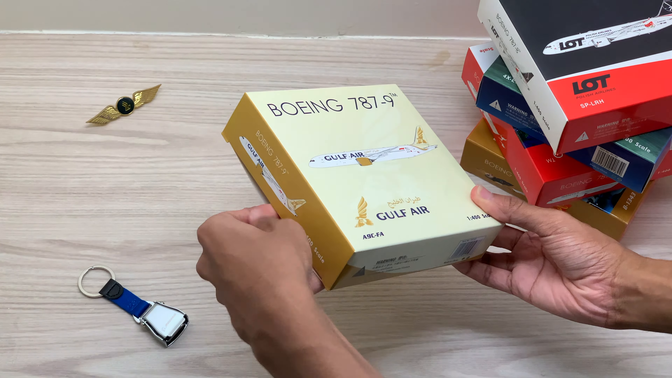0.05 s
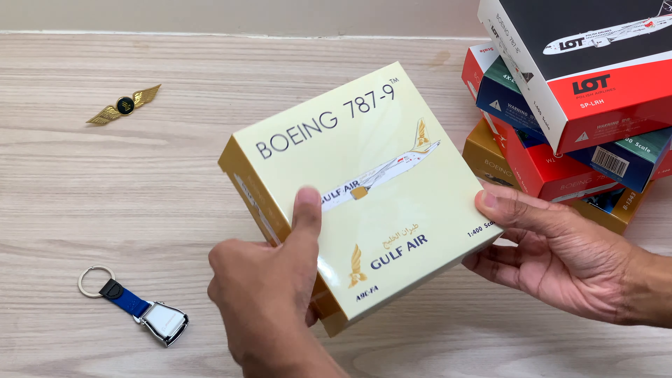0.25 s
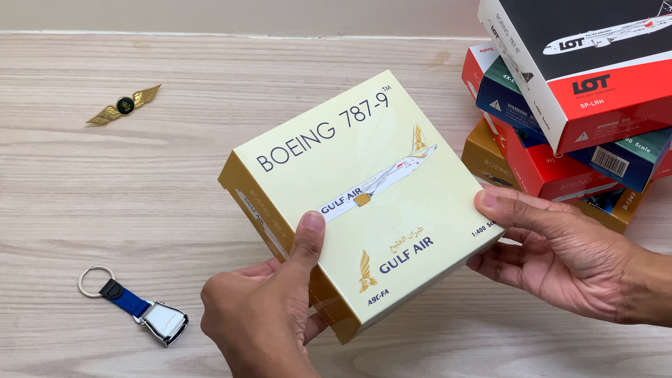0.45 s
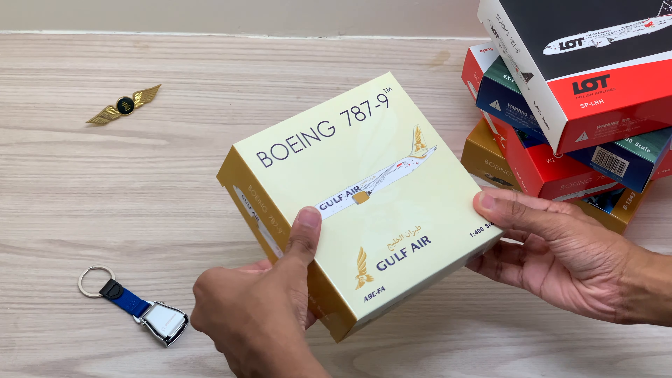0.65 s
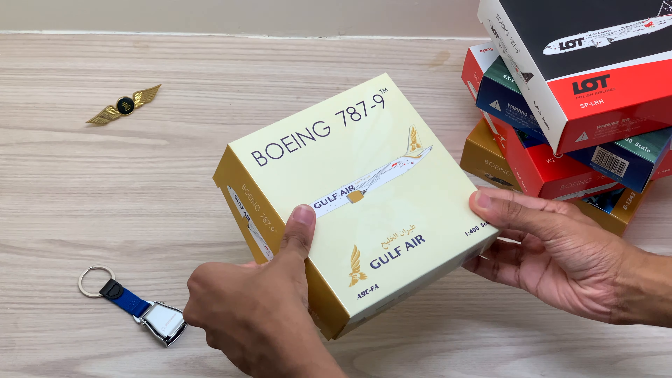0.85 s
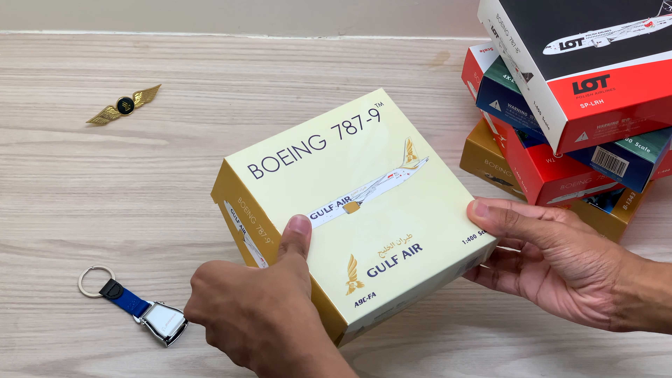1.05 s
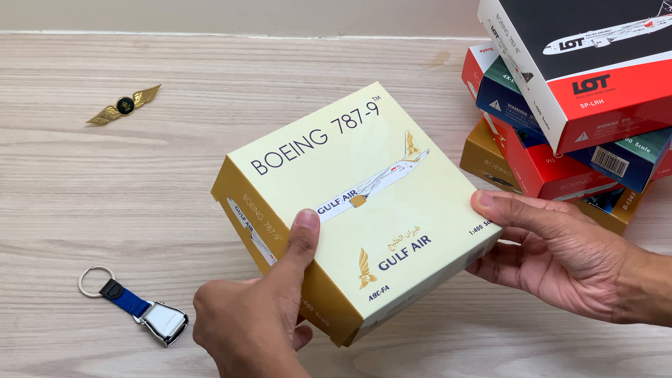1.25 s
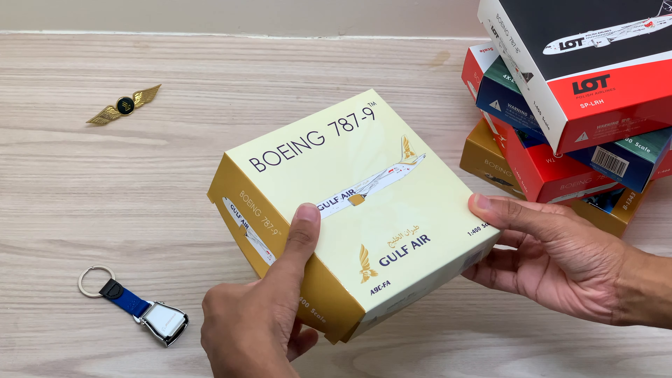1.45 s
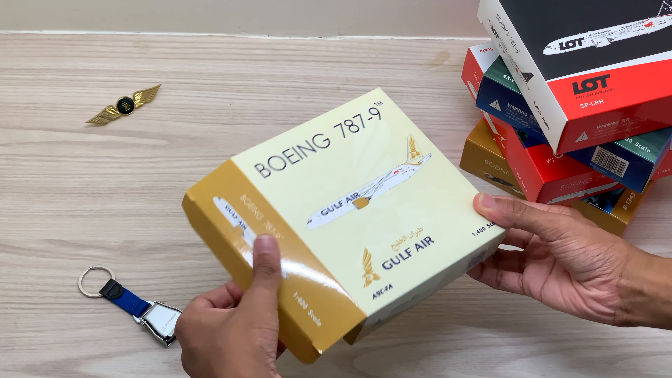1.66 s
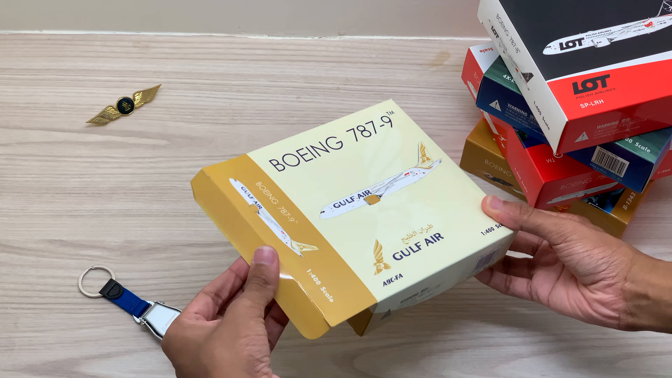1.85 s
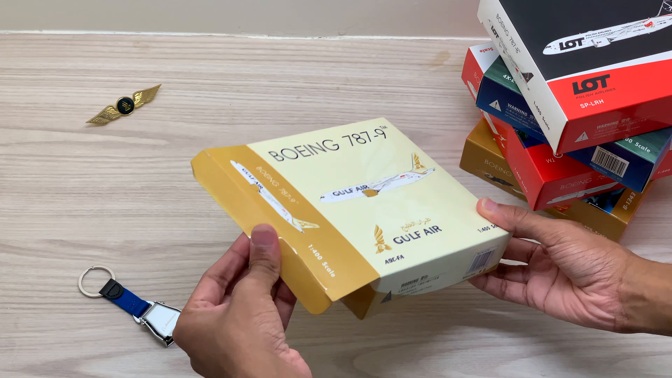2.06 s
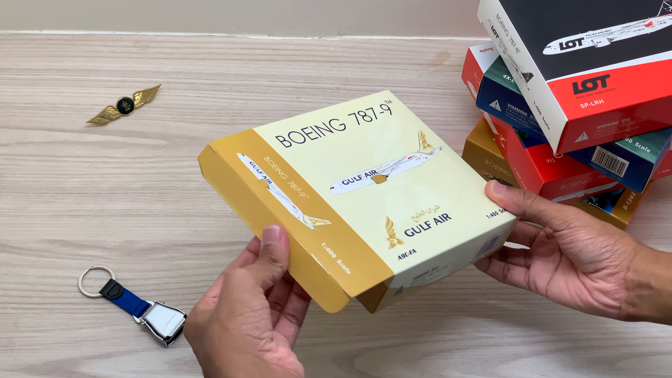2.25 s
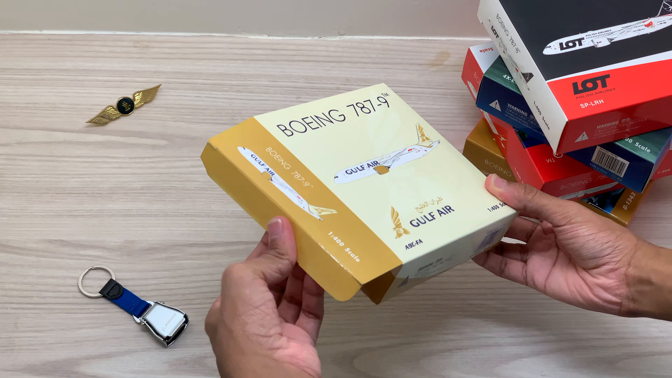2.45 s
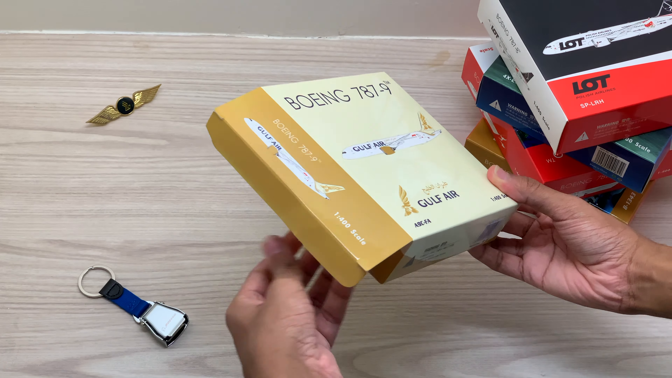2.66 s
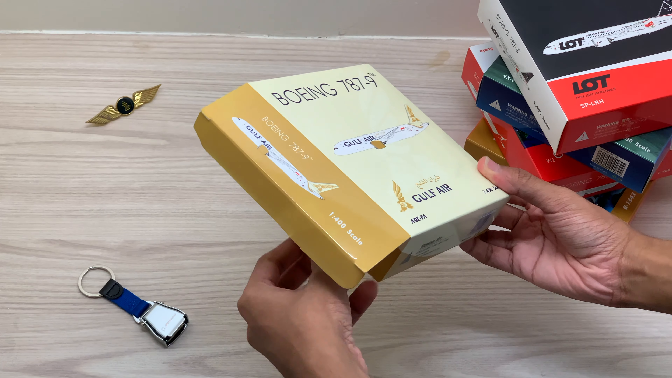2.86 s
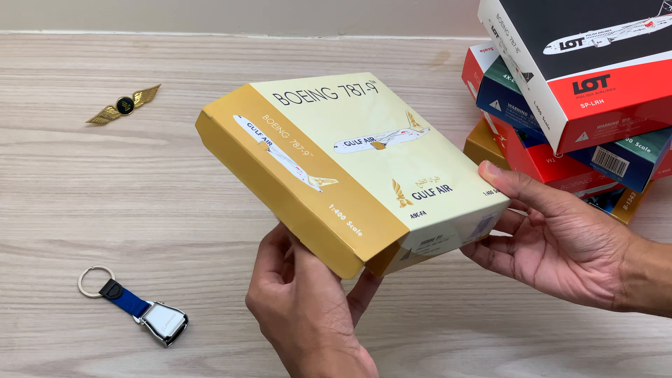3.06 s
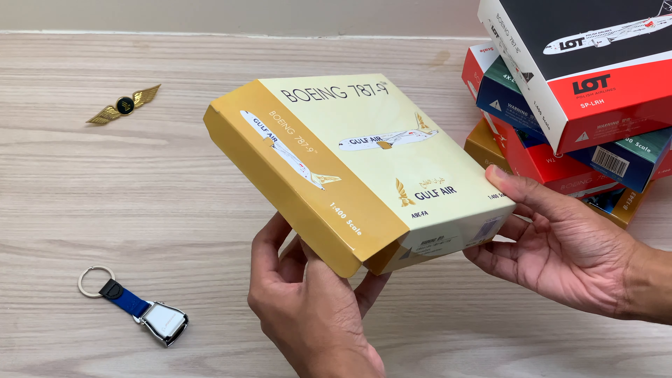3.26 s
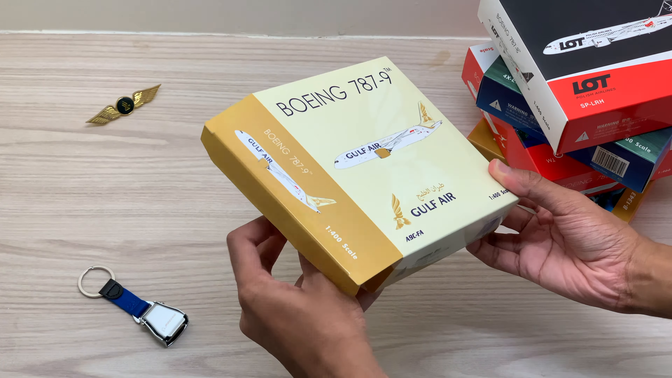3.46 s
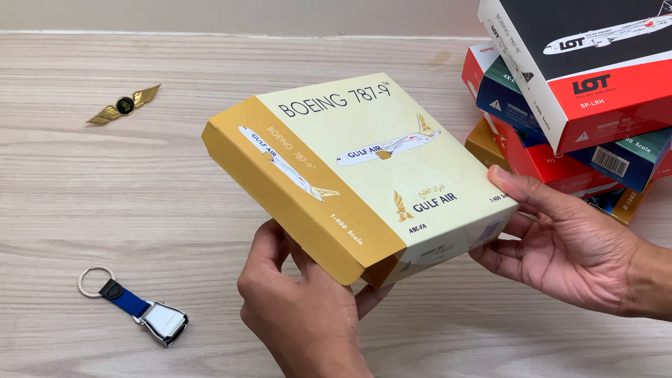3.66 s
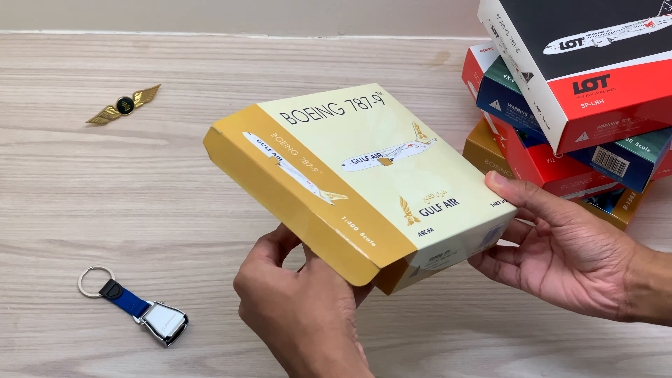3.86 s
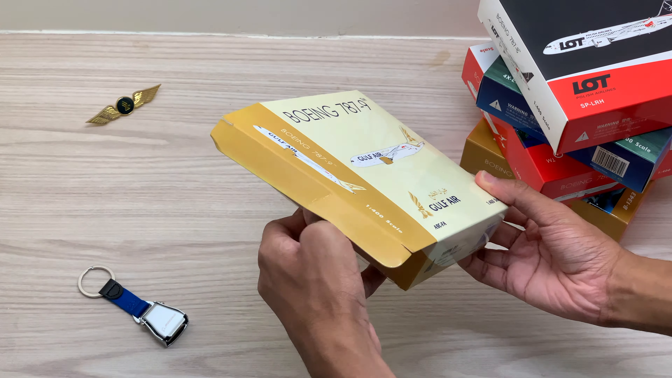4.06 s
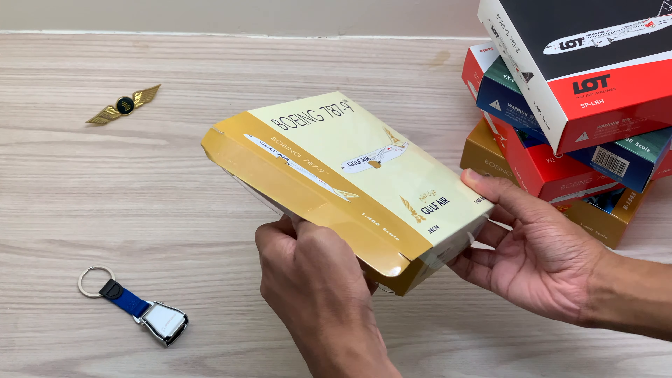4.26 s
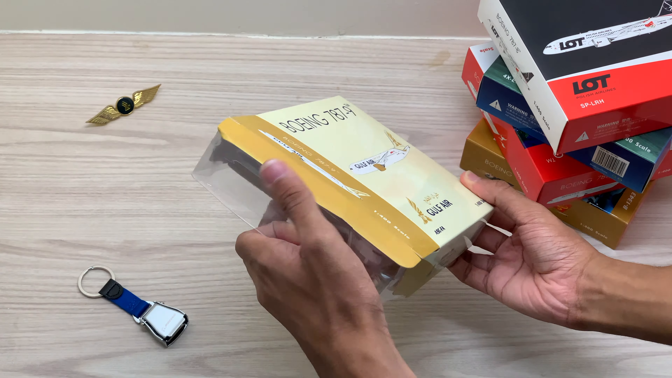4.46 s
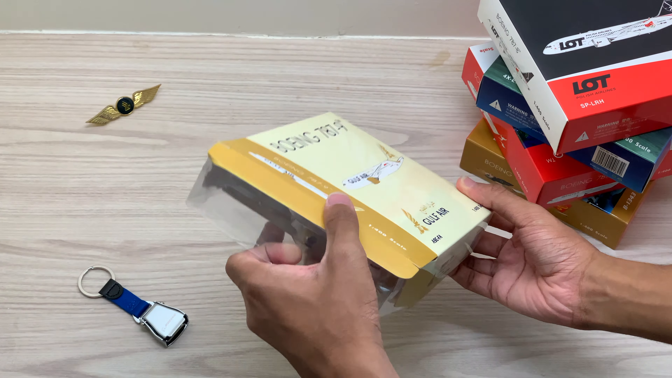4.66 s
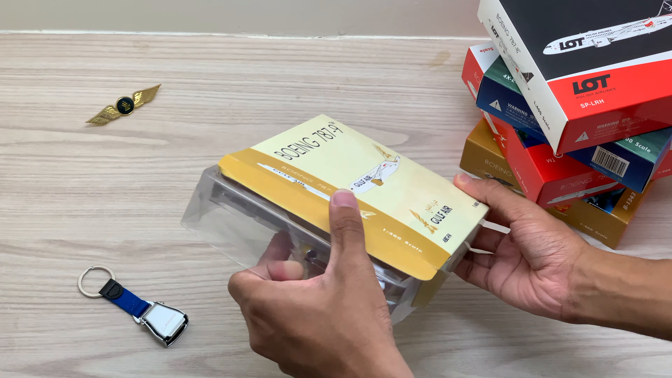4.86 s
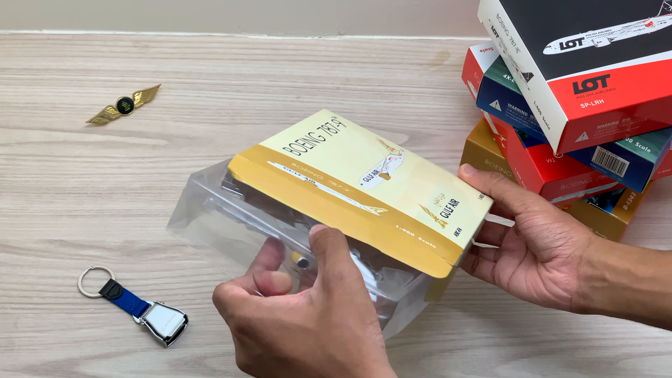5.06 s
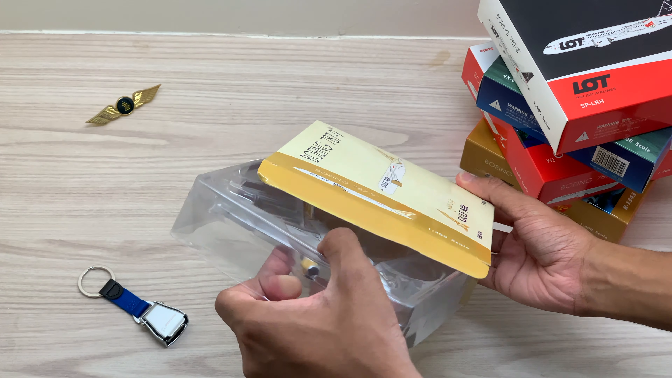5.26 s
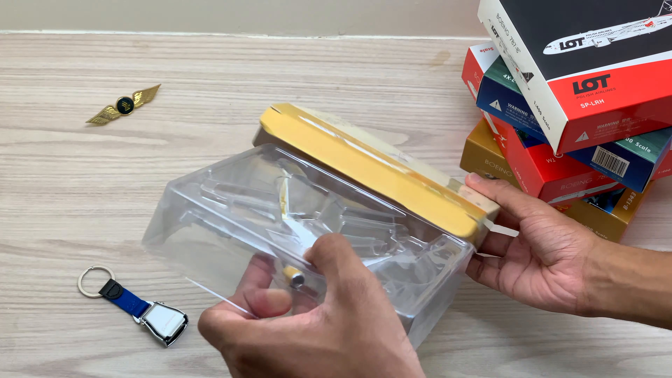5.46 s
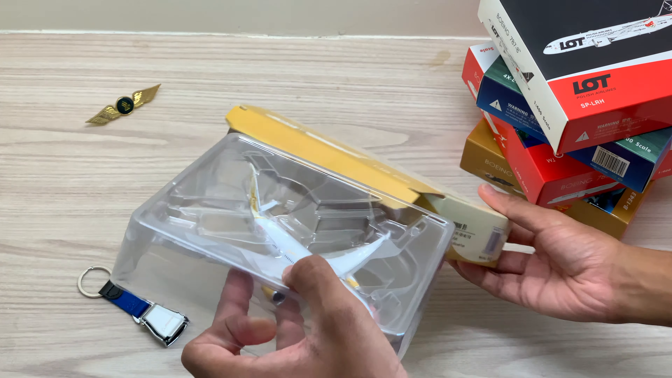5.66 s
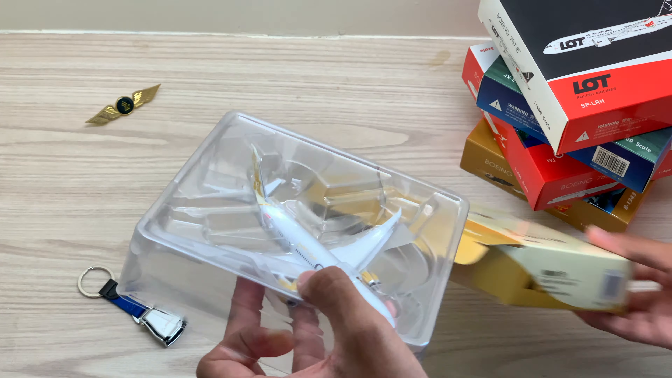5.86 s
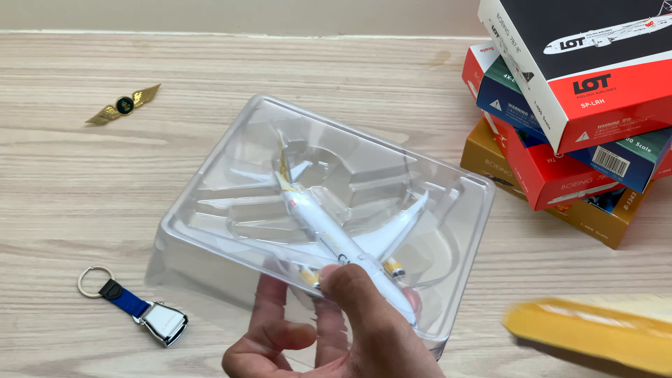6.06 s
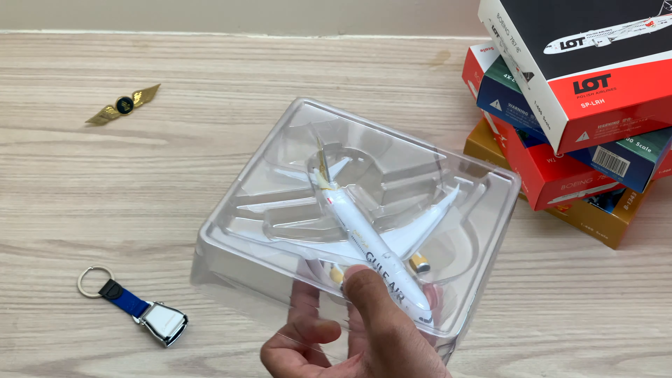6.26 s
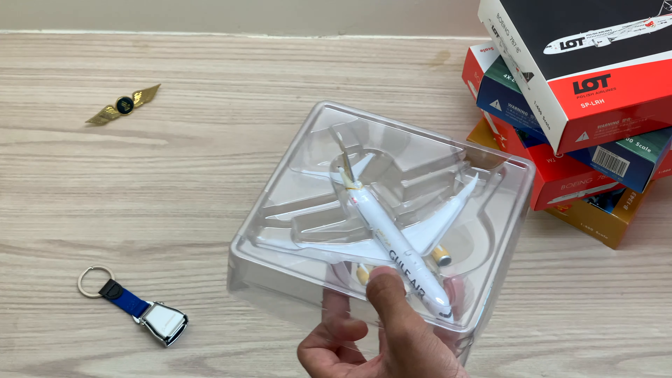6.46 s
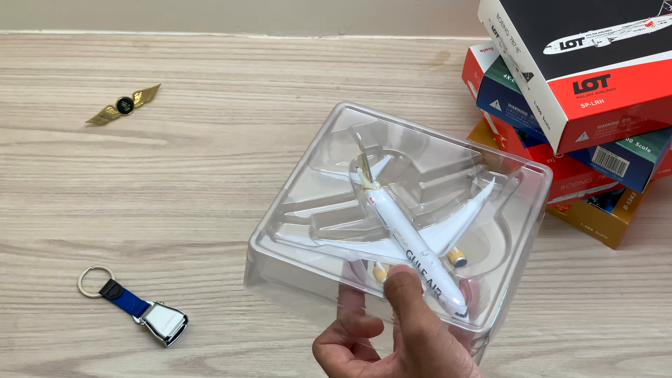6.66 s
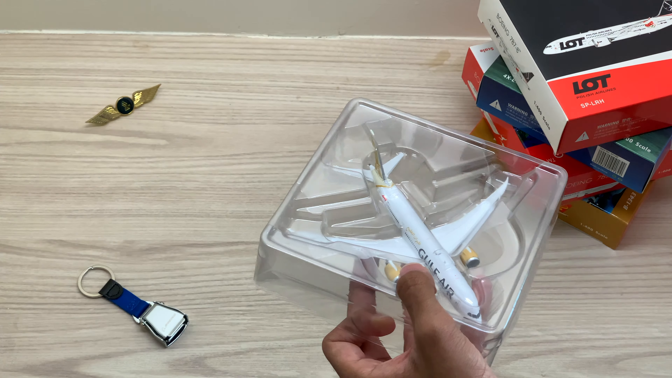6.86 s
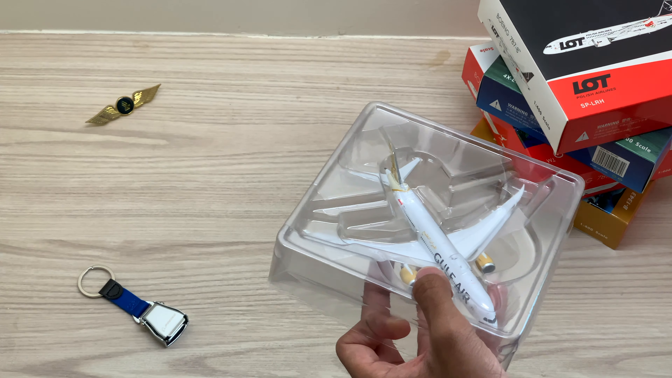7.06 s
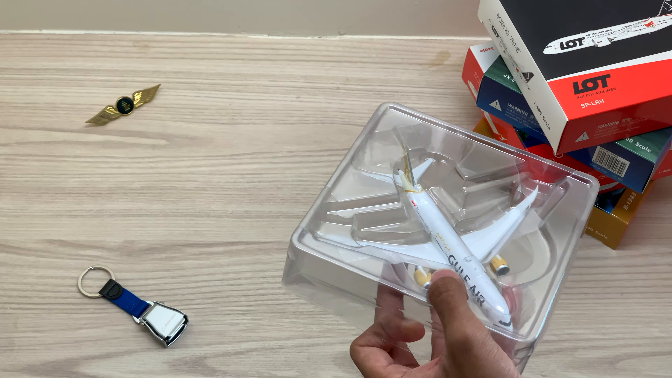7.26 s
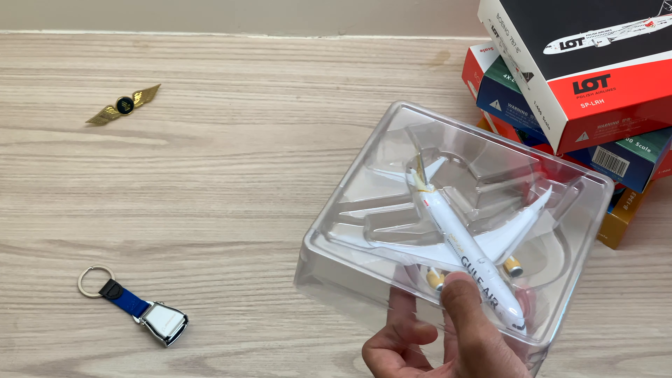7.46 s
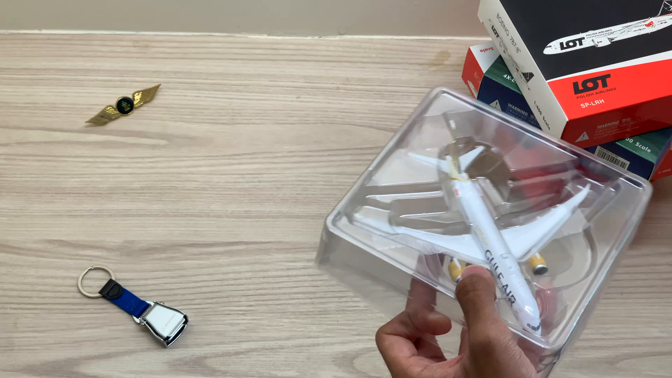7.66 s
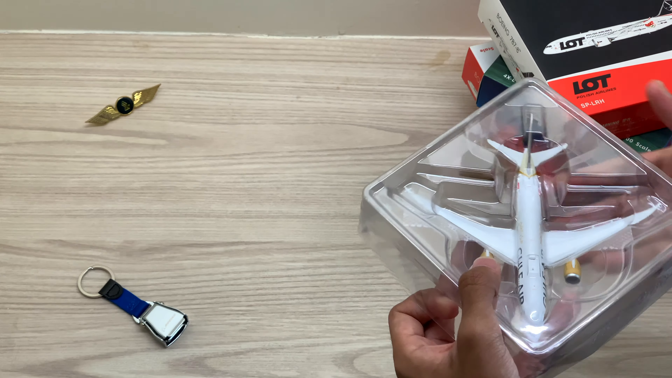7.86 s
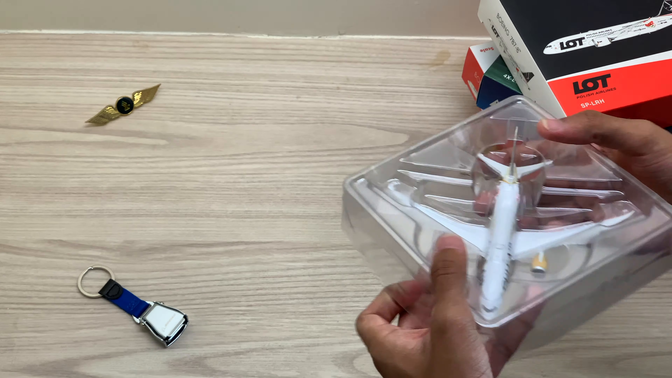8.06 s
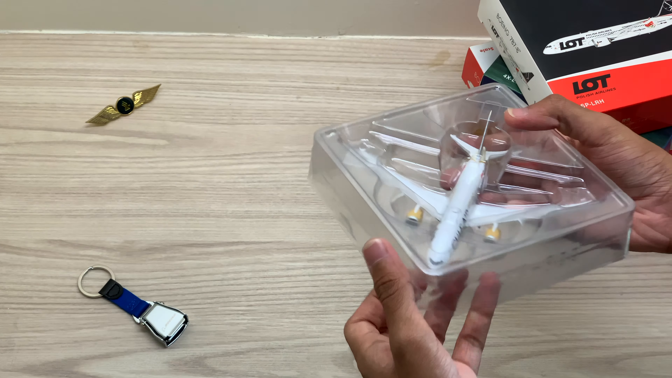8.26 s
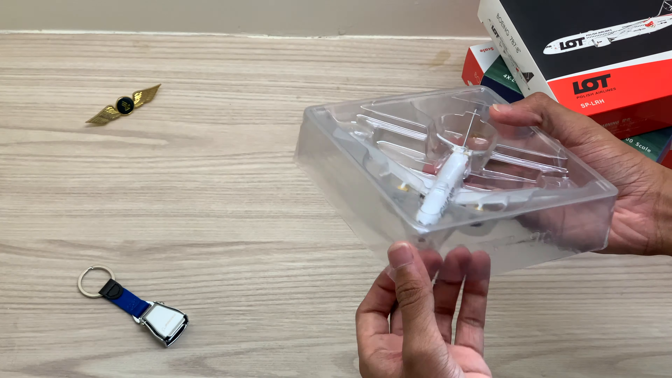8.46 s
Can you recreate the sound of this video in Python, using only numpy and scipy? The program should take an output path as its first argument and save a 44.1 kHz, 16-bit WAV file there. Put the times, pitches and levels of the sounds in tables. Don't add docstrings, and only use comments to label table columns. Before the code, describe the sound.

Close, dry thumps and rubs of a small card box, sharp plastic crackles as a tray is pulled free, a quiet pause, then more snaps.

```python
import sys
import numpy as np
from scipy import signal
from scipy.fft import rfft, irfft, next_fast_len
from scipy.io import wavfile
from scipy.ndimage import uniform_filter1d

SR = 44100
rng = np.random.default_rng(int(sys.argv[2]) if len(sys.argv) > 2 else 0)


def level_to_linear(level):
    exponent = np.asarray(level, float) / 20
    return 10 ** exponent


def to_wav(sig):
    pcm = np.clip(np.atleast_2d(sig), -1, 1) * 32767
    pcm = np.round(pcm).astype(np.int16)
    wavfile.write(sys.argv[1], SR, pcm.T)


N = 375732


def evened(x):
    return x / np.sqrt(np.mean(x ** 2) + 1e-20)


def read(points, hz):
    f, value = np.transpose(points)
    return np.interp(np.log(hz + 1), np.log(f + 1), value)


def slow(hz):
    knots_per_s = 200
    knots = rng.standard_normal(int(N / SR * knots_per_s) + 2)
    bell = np.exp(-(np.arange(-200, 201) * hz / knots_per_s) ** 2)
    smooth = evened(np.convolve(knots, bell, "same"))
    return np.interp(np.arange(N) * knots_per_s / SR, np.arange(len(knots)), smooth)


def band(x, lo_hz, hi_hz):
    return signal.sosfilt(signal.butter(4, [lo_hz, hi_hz], "band", fs=SR, output="sos"), x)


def resonate(x, hz, width):
    turn = np.exp(2j * np.pi * np.cumsum(hz * np.ones(N)) / SR)
    r = np.exp(-np.pi * width / SR)
    return turn * signal.lfilter([np.sqrt(2 * (1 - r * r))], [1, -r], x / turn)


def ring(x, hz, width):
    r = np.exp(-np.pi * 3.24 * width / SR)
    pole = r * np.exp(2j * np.pi * hz / SR)
    return signal.lfilter([np.sqrt(2 * (1 - r * r) ** 3 / (1 + r * r))], [1, -2 * pole, pole ** 2], x)


def patchy(x, patchy_db):
    z = signal.stft(x, nperseg=256)[2]
    patches = uniform_filter1d(uniform_filter1d(rng.standard_normal(z.shape), 3, 0), 18, 1)
    return signal.istft(z * level_to_linear(patchy_db * evened(patches)), nperseg=256)[1][:N]


# pitch_hz, lead_rad
TREBLE_LEAD = [(3000, 1.1), (4500, 1.7), (8000, 1.3), (13000, 1.2), (15500, 1.1)]


def to_microphones(x):
    size = next_fast_len(N)
    turn = np.exp(-1j * read(TREBLE_LEAD, np.fft.rfftfreq(size, 1 / SR)))
    return np.array([x, irfft(rfft(x, size) * turn, size)[:N]])


RIGHT_LAG = 2


# pitch_hz, likeness (0 to 1)
LIKENESS = [(60, 0.33), (180, 0.95), (550, 0.17), (1650, 0.16), (4970, 0.03), (15000, 0.21)]


def hiss(spectrum, patchy_db):
    frames, hz = N // 256 + 5, np.fft.rfftfreq(1024, 1 / SR)
    a, b, c, d, patches = rng.standard_normal((frames, 513, 5)).T
    patches = evened(uniform_filter1d(uniform_filter1d(patches, 10, 0), 10, 1))
    like, left = read(LIKENESS, hz)[:, None], a + 1j * b
    z = np.array([left, like * left + np.sqrt(1 - like ** 2) * (c + 1j * d)])
    z *= level_to_linear(read(spectrum, hz)[:, None] + patchy_db * patches)
    return evened(signal.istft(z, nperseg=1024, noverlap=768)[1][:, :N])


# pitch_hz, level_db (per Hz)
AIR_COLOUR = [(18, -24), (30, -21.5), (59, -11), (164, -43), (213, -6.5), (292, -16), (532, -3), (767, -14),
              (1020, -9.5), (1230, -13.5), (4910, -47), (13600, -60), (15500, -64)]
# pitch_hz, width_hz, level_db
MACHINE_HUM = [
    (125, 2.7, -64),
    (222.7, 5.3, -56),
]
# time_s, rumble_db, drone_db
BUILDING_RUMBLE = [(0.0, -92, -31), (0.26, -74, -55), (0.38, -83.5, -65), (1.42, -72, -32),
                   (1.56, -53, -24), (1.8, -101, -50.5), (3.39, -49, -28), (4.699, -67, -67),
                   (4.91, -86, -43), (5.078, -59.5, -68.5), (6.219, -57.5, -78), (7.261, -52.5, -30.5),
                   (7.881, -67.5, -55), (8.52, -46.5, -31.5)]


def background():
    hum = 0
    for hz, width, db in MACHINE_HUM:
        hum = hum + level_to_linear(db + 2 * slow(2)) * resonate(rng.standard_normal(N), hz, width).real
    s, rumble_db, drone_db = np.transpose(BUILDING_RUMBLE)
    t = np.arange(N) / SR
    rumble = resonate(rng.standard_normal(N), 62 + 9 * slow(0.66), 6.6).real
    low = level_to_linear(np.interp(t, s, rumble_db)) * evened(band(rumble, 45, 140))
    low += level_to_linear(np.interp(t, s, drone_db) - 10.5) * evened(band(rng.standard_normal(N), 100, 390))
    return level_to_linear(-42.5) * hiss(AIR_COLOUR, patchy_db=1.2) + hum + low


# pitch_hz, t60_s
WALL_DECAY = [(300, 0.037), (1000, 0.16), (4000, 0.21), (12000, 0.099)]


def room():
    taps = np.zeros((2, SR // 2))
    at = np.arange(60, SR // 2 - 20, 20) + rng.integers(0, 20, (2, (SR // 2 - 61) // 20))
    np.put_along_axis(taps, at, rng.choice([-1., 1.], at.shape), 1)
    hz, t, z = signal.stft(taps, SR, nperseg=256)
    tail = signal.istft(z * level_to_linear(-60 * t / read(WALL_DECAY, hz)[:, None]), SR, nperseg=256)[1]
    return tail / np.linalg.norm(tail[0])


# start_s, peak_db, pitch_hz, t60_s
TABLE_THUDS = [(0.232, -30, 118.3, 0.074), (0.72, -34.5, 177, 0.26), (1.349, -23.5, 178, 0.087),
               (1.541, -17, 122, 0.23), (1.9, -50, 98, 0.45), (3.108, -34, 140, 0.15),
               (3.454, -39, 125, 0.3), (3.996, -33.5, 125.8, 0.18), (4.399, -94.5, 166.4, 0.3),
               (4.893, -45, 150.5, 0.29), (7.153, -37, 123, 0.75)]


def thuds():
    out, u = np.zeros(N), np.arange(12000) / SR
    for s, db, hz, t60 in TABLE_THUDS:
        tone = level_to_linear(db - 60 * u / t60) * np.sin(2 * np.pi * hz * u)
        out[round(s * SR):][:len(u)] += tone * np.minimum(u / 0.017, 1)
    return out


# start_s, peak_db, pitch_hz, t60_s
TINY_TAP = (6.243, -49, 5100, .075)


def ping():
    s, db, hz, t60 = TINY_TAP
    u = np.arange(N) / SR - s
    spray = level_to_linear(db - 60 * abs(u) / t60) * (u > 0) * rng.standard_normal(N)
    return ring(spray, hz, 200).real


# time_s, pitch_hz (slip rate), level_db
SQUEAK_PATH = [
    (4.885, 845, -31),
    (4.899, 872, -9.5),
    (4.93, 852, -19),
    (4.967, 794, -21),
    (5.0, 799, -31.5),
    (5.04, 858, -36),
    (5.1, 854, -45),
]
# multiple of the slip rate, level_db (above the octave)
SQUEAK_PARTIALS = [(3, -10), (4, -10), (5, -18)]


def squeak():
    s, *columns = np.transpose(SQUEAK_PATH)
    t = np.arange(round(s[0] * SR), round(s[-1] * SR)) / SR
    n = len(t)
    hz, db = (np.interp(t, s, c) for c in columns)
    octave_db = db - 3.5
    turns = 2 * np.pi * np.cumsum(hz * (1 + 0.009 * slow(90)[:n])) / SR
    tone = level_to_linear(db) * np.sin(turns) + level_to_linear(octave_db) * np.sin(2 * turns)
    for k, above_db in SQUEAK_PARTIALS:
        tone += level_to_linear(octave_db + above_db + 1.8 * slow(50)[:n]) * np.sin(k * turns)
    flutter = level_to_linear(4 * slow(74)[:n] - 1)
    out = np.zeros(N)
    out[round(s[0] * SR):][:n] = np.sqrt(2) * tone * flutter * signal.windows.tukey(n, .1)
    return out


# pitch_hz, peak_db, t60_s
LANDING_MODES = [(440, -6.5, 0.15), (545, -14, 0.22), (594, -14, 0.11), (721, -3, 0.053), (1420, -23, 0.27),
                 (1534, -22.5, .16), (1870, -23, .08), (2060, -29, .05), (3090, -26, 0.044)]


def knock():
    start_s, rise_s = 6.8805, 0.0027
    out, u = np.zeros(N), np.arange(9000) / SR
    modes = sum(level_to_linear(db - 60 * u / t60) * np.sin(2 * np.pi * hz * u) for hz, db, t60 in LANDING_MODES)
    out[round(start_s * SR):][:9000] += np.minimum(u / rise_s, 1) * modes
    return out


# start_s, peak_db, pitch_hz, edge_db (bright edge above the peak)
DRY_CRACKS = [(1.007, -15, 2280, -7), (1.38, -9, 1520, -4.5), (1.44, -11, 2500, -3),
              (2.875, -23, 880, -17.5), (3.031, -9.5, 1590, -12), (3.309, -13, 1930, -11),
              (3.815, -12, 1500, -1.5), (3.955, -20, 2500, -6.5), (4.363, -14, 1493, -10),
              (4.421, -6, 1200, -12), (4.794, -19, 1110, -11.5), (4.817, -8.5, 1150, -11.5),
              (4.838, -12, 1250, -9.5), (4.876, -2.5, 2760, -5), (5.451, -6, 2000, -3.5),
              (8.0, -7, 1800, -16), (8.049, -22.5, 2500, -2.5), (8.138, -7, 1300, -12),
              (8.174, -7, 1200, -14), (8.19, -6, 1100, -11), (8.222, -13, 1093, -12),
              (8.309, -9.5, 2200, -3), (8.501, -6, 1700, -15), (1.222, -15, 1005, -4),
              (.712, -12, 2500, -4), (1.303, -20, 3200, -4), (1.338, -16, 2200, -4), (2.966, -16, 1500, -8),
              (3.148, -20, 2100, -8), (3.247, -26, 2500, -6), (3.297, -22, 3000, -6),
              (3.341, -20, 3500, -4), (3.469, -14, 1750, -8), (3.518, -20, 1500, -10),
              (3.635, -12, 1300, -10), (4.022, -4, 1200, -14), (4.086, -6, 1300, -10),
              (5.347, -6, 1400, -8), (8.122, -16, 1600, -8), (8.287, -22, 2500, -4),
              (8.399, -20, 1600, -10), (8.46, -16, 1500, -8), (4.388, -9.5, 890, -10)]


def cracks():
    fall_cycles, edge_t60_s = 8.0, .012
    out, u = np.zeros(N + 900), np.arange(900) / SR
    for (s, db, hz, edge_db), noise in zip(DRY_CRACKS, rng.standard_normal((len(DRY_CRACKS), 900))):
        part = out[round(s * SR):][:900]
        part += level_to_linear(db - 60 * u * hz / fall_cycles) * np.sin(2 * np.pi * hz * u)
        part += level_to_linear(db + edge_db - 60 * u / edge_t60_s) * band(noise, 2400, 9500)
    return out[:N]


def stroke_db(t, s, hold, rise_db_per_s, release_db_per_s):
    rise = rise_db_per_s * np.maximum(s - t, 0)
    release = release_db_per_s * np.maximum(t - s - hold, 0)
    return np.maximum(-rise - release, -200)


# pitch_hz, level_db (per Hz)
SHEET_COLOUR = [(300, -14), (520, 2), (1000, -10), (2000, -11.5), (3200, -17.5), (5000, -28.5), (7200, -32),
                (8800, -29.5), (13000, -38), (15500, -39)]
SHEET_BORDERS = [330, 900, 2200, 5000, 15600]


def sheet(drive, lo_hz, hi_hz):
    colour = level_to_linear(read(SHEET_COLOUR, np.linspace(0, SR / 2, 257)))
    taps = signal.firwin2(1025, np.linspace(0, 1, 257), colour)
    taps = band(signal.minimum_phase(np.convolve(taps, taps)), lo_hz, hi_hz)
    return signal.oaconvolve(drive, taps / np.linalg.norm(taps))[:N]


# start_s (full effort), hold_s, level_db, top_db (topmost hiss above it)
FINGER_SCRAPES = [(0.746, .03, -38, -16), (0.916, 0.017, -41, -7.5), (1.042, 0.012, -44, -7),
                  (1.133, 0.026, -46.5, -2), (1.212, 0.03, -43.5, -6), (1.307, 0.078, -36, -9.5),
                  (1.402, 0.029, -36.5, -9), (2.709, 0.022, -41, -3.5), (2.794, .03, -44.5, -6.5),
                  (2.953, 0.025, -50.5, -8), (3.04, 0.023, -42.5, -9), (3.085, 0.018, -33.5, -14.5),
                  (3.199, 0.0067, -40, -11.5), (3.336, 0.024, -30.5, -9.5), (3.443, 0.0087, -43.5, -8),
                  (3.564, 0.029, -38, -2), (3.787, 0.063, -33.5, -9), (3.954, 0.044, -38, -5),
                  (4.102, 0.033, -33, -8), (4.285, .05, -32, -7), (4.387, .04, -25.5, -4.5),
                  (4.472, 0.035, -41, -8.5), (4.546, 0.027, -43.5, -3), (5.13, 0.068, -41, -3),
                  (5.183, 0.11, -50, 1.5), (5.399, 0.072, -36.5, -1.5), (6.943, 0.062, -45, -20),
                  (7.207, 0.035, -46.5, -5.5), (8.042, 0.051, -49, -4), (8.078, 0.013, -41, -9.5),
                  (8.124, 0.017, -34.5, -13), (8.182, 0.011, -33, -3.5), (8.292, 0.06, -34, -6),
                  (8.437, 0.029, -48, -8)]


def scrapes():
    t = np.arange(0, N + 64, 64) / SR
    s, hold, db, top_db = np.transpose(FINGER_SCRAPES)[..., None]
    level = level_to_linear(db + stroke_db(t, s, hold, rise_db_per_s=1803, release_db_per_s=459.5))
    low, high = (np.repeat(np.sqrt((v ** 2).sum(0)), 64)[:N] for v in (level, level * level_to_linear(top_db)))
    noise = rng.standard_normal(N)
    fine = sheet(low * noise, 3600, 8600) + sheet(high * noise, 10600, SHEET_BORDERS[-1])
    return to_microphones(patchy(fine, patchy_db=4.5))


# pitch_hz, width_hz, level_db
MODES = [(384, 45, -9.5), (471, 40, 2), (561, 45, 1.5), (680, 52.4, 1), (780, 53, -0.5), (859, 58.5, -0.5),
         (1010, 78, -3.5), (1150, 74, -6), (1290, 46.4, -2), (1482, 69, -0.5), (1747, 54, -2.5),
         (2000, 120, 2.5), (2280, 88, -0.5), (2600, 160, -2), (2890, 130, -2.5), (3230, 150, -2),
         (3580, 140, 1), (4020, 170, -5)]


def near_modes(centre_hz, slope_db):
    hz, _, db = np.transpose(MODES)[..., None]
    share = level_to_linear(db - slope_db * abs(np.log2(hz / centre_hz)))
    return share / np.sqrt((share ** 2).sum(0))


# start_s (full effort), hold_s, effort_db, pitch_hz (centre of the ringing),
# rustle_db (edges above the effort)
BOX_JERK_STROKES = [(.19, 0.058, -13.5, 590, -20.5), (.728, 0.03, -11, 980, -4),
                    (.79, 0.048, -25, 1130, -4.5), (1.006, .004, -36, 2170, -13),
                    (1.05, 0.019, -20.5, 780, -24), (1.14, 0.02, -19, 680, -29),
                    (1.525, 0.021, -7, 550, -17.5), (2.0, 0.0069, -25, 780, -13.5),
                    (2.192, 0.0092, -36, 1000, -6.5), (2.556, 0.0059, -33.5, 2230, 2.5),
                    (2.715, 0.0054, -23, 970, -7.5), (2.965, 0.012, -19, 780, -24.5),
                    (3.03, 0.024, -28.5, 1450, -11.5), (3.205, 0.086, -32.5, 750, -13),
                    (3.31, 0.081, -30, 1690, 1), (3.46, 0.043, -24, 774, -29),
                    (3.59, 0.037, -16, 1010, -19)]
BOX_SLIDE_STROKES = [(0.0, 0.062, -36.5, 500, -21.5), (.27, 0.06, -27, 800, -24),
                     (.62, 0.11, -37.5, 830, -22.5), (.87, 0.098, -26, 792, -18),
                     (1.2, 0.016, -18, 836, -18), (1.3, 0.091, -25.5, 2010, -6),
                     (1.36, 0.075, -22, 598, -12.5), (1.59, 0.046, -24.5, 816, -13),
                     (1.82, 0.0044, -51, 790, 7), (1.9, 0.0426, -37.5, 455, -22),
                     (2.62, 0.025, -49.5, 1525, 12.5), (2.78, 0.082, -35.5, 830, -18.5),
                     (3.11, 0.024, -28.5, 750, -8.5)]
TRAY_JERK_STROKES = [(3.972, .045, -21, 900, -20), (4.035, .025, -16, 500, -26), (4.69, .005, -50, 2600, 6),
                     (4.78, 0.09, -19, 1140, -3), (6.425, 0.036, -16, 430, -20),
                     (6.9, 0.025, -22, 480, -19), (7.27, 0.00427, -26, 756, -19),
                     (7.39, 0.029, -42, 990, -10), (7.5, 0.077, -42.5, 710, -17),
                     (8.0, 0.11, -33.5, 1530, -21.5), (8.09, 0.0028, -27.5, 1500, -4.5),
                     (8.292, 0.078, -28, 1790, -12.5), (8.5, 0.012, -21.5, 1510, -16.5)]
TRAY_SLIDE_STROKES = [(3.805, 0.043, -25.5, 935, -9), (3.87, 0.13, -32.5, 960, -13),
                      (4.095, 0.023, -18, 830, -3), (4.31, 0.12, -21.5, 1292, -7),
                      (4.36, 0.047, -15.5, 948, -2), (4.415, 0.0045, -13, 530, -18.5),
                      (4.58, 0.0067, -27, 1270, -7), (4.84, 0.11, -16, 1185, -1),
                      (5.15, 0.027, -34, 775, 4), (5.36, 0.056, -14, 1190, -6),
                      (5.445, 0.015, -17.5, 494, -11.5), (6.96, 0.044, -33.5, 1400, -9),
                      (7.16, 0.032, -25, 940, -8.5), (8.15, 0.06, -24, 1260, -11),
                      (8.43, 0.018, -22.5, 1690, -24.5)]


def strokes():
    dulling = 0.16
    t, power = np.arange(0, N + 64, 64) / SR, 0
    for rows, rise, release in [(BOX_JERK_STROKES, 829, 339), (BOX_SLIDE_STROKES, 263, 319),
                                (TRAY_JERK_STROKES, 1002.5, 318), (TRAY_SLIDE_STROKES, 278, 309)]:
        for s, hold, db, hz, rustle_db in rows:
            under = stroke_db(t, s, hold, rise, release)
            rustle = rustle_db + dulling * under * (t > s)
            ribs = -2.5 + 0.64 * rustle
            share = np.vstack([near_modes(hz + 0 * t, slope_db=17), level_to_linear([0 * t, ribs, rustle])])
            power = power + (level_to_linear(db + under) * share) ** 2
    return np.repeat(np.sqrt(power), 64, 1)[:, :N]


# start_s, peak_db, pitch_hz (centre of the ringing), ribs_db, rustle_db (above the peak)
BOX_AND_PULL_BLOWS = [(.175, -3, 740, -12, -15), (.203, 3, 700, -27, -25), (.230, 2, 520, -22, -18),
                      (.703, -5, 615, 2.5, 2), (.786, 0, 1130, -43, -10), (1.124, -17.5, 2170, -13, -30),
                      (1.153, -5.5, 670, -6, -16), (1.348, -3.5, 640, 2, -3), (1.507, -7.5, 604, 0, -5),
                      (1.518, 13, 511, -30, -14.5), (1.996, -20, 796, 3, -1), (2.192, -21, 1720, 3, 4),
                      (2.554, -23.5, 2630, 24, 21), (2.963, -14.5, 760, -1, -16.5), (3.04, -10.5, 1470, 2, -28),
                      (3.107, -7, 587, -6, -29), (3.306, -8, 1740, 2.5, -14), (3.445, -31, 1700, 15, 12.5),
                      (3.47, -7.5, 1720, -8, -19), (3.579, 1, 1270, -6.5, -9), (3.631, -11, 1290, -24, -1),
                      (3.788, -10.5, 1790, -7, 0), (3.964, -4, 760, -8, -12), (4.006, -16.5, 667, -26, -16),
              (4.021, 9, 577, -41.5, -40), (4.082, -2, 1320, -4, -20), (4.338, -3, 1310, -19, -1),
              (4.692, -19, 2780, -26, -32), (4.77, -11.5, 1210, 2.5, 1.5), (4.813, 3.5, 1130, -10, -38),
              (5.317, -16, 862, 4, 10.5), (5.347, -1, 1380, 2.5, 1)]
TRAY_BLOWS = [(6.394, -16.5, 2550, -40, -3.5), (6.412, -1.5, 440, -5, -7.5), (6.426, 2, 450, -11, -40),
              (6.881, -2, 700, -11, -26), (6.881, -13.5, 1660, -21, -19), (7.268, -25, 736, 8, 5),
              (7.998, -7.5, 1550, -2.5, -42), (8.121, -12, 1680, -15, -6.5), (8.138, -12.5, 1740, 6, -32),
              (8.166, -13, 1080, -15, -7.5), (8.219, -18, 1200, -20, -25), (8.304, -9.5, 2270, -15, 3.5),
              (8.436, -12.5, 1570, -16, -29), (8.499, -13, 1580, -4, -17)]
FAINT_TICKS = [(.327, -62, 2580, 28, -26), (0.441, -48, 3450, -1, -16), (.507, -22.5, 4030, -1.5, -23),
               (0.589, -25.5, 1900, 4, -12), (0.639, -19.5, 1920, 0, -24.5), (0.657, -13.5, 1780, -3, -25),
               (1.888, -32.5, 2630, -27, -27), (2.798, -20.5, 3520, -21, -1), (6.243, -51, 4000, 2, 6),
               (7.38, -26.5, 1720, -27, -5)]


def snaps():
    t60_s, rise_s = 0.056, 0.0054
    force = np.zeros((len(MODES) + 3, N + 5000))
    u = np.arange(5000) / SR
    for rows, push_db in [(BOX_AND_PULL_BLOWS, 2.5), (TRAY_BLOWS, 9), (FAINT_TICKS, 2.5)]:
        for s, db, hz, ribs_db, rustle_db in rows:
            envelope = level_to_linear(db - 3.5 - 60 * u / t60_s) * np.minimum(u / rise_s, 1)
            spray = envelope * rng.standard_normal(5000)
            share = np.vstack([near_modes(hz, slope_db=33.0), level_to_linear([[0], [ribs_db], [rustle_db]])])
            at = round(s * SR)
            force[:, at:at + 5000] += share * spray
            force[:-3, at + 40] += share[:-3, 0] * level_to_linear(db + push_db)
    return force[:, :N]


def slips(per_s, spread_db, clump_db):
    size = level_to_linear(spread_db * np.minimum(rng.exponential(1, N), 5) + clump_db * slow(100))
    return evened(size * rng.standard_normal(N) * (rng.random(N) < per_s / SR))


def handling():
    force = level_to_linear(1) * strokes()
    grains = slips(per_s=2800, spread_db=1.0, clump_db=2.5)
    blows = snaps()
    drive = force * grains + blows
    evening = 0.44
    fine = grains / (abs(uniform_filter1d(grains ** 2, 160)) + .05) ** (evening / 2)
    drive[-2:] = force[-2:] * evened(fine) + blows[-2:]
    broad, ribs, edges = drive[-3:]
    out = np.zeros((2, N))
    for push, (hz, width, _) in zip(drive, MODES):
        facing = np.exp(.75j * rng.standard_normal((2, 1)))
        out += (facing * ring(push * level_to_linear(3.48 * slow(26.7)), hz, width)).real
    sheet_hz, _, ribs_hz, edges_hz, top_hz = SHEET_BORDERS
    out = level_to_linear(3) * band(out, 390, 7400) + level_to_linear(-10.0) * sheet(broad, sheet_hz, ribs_hz)
    out += level_to_linear(-3.5) * patchy(sheet(ribs, ribs_hz, edges_hz), patchy_db=3.5)
    out += level_to_linear(-25) * evened(band(broad, 203.6, 339)) * np.std(broad)
    out[1] = np.roll(out[1], RIGHT_LAG)
    rustle = level_to_linear(-9.5) * patchy(sheet(edges, edges_hz, top_hz), patchy_db=5.0)
    return out * level_to_linear([[1.2], [-1.2]]) + to_microphones(rustle)


def scene():
    near = level_to_linear(-2.0) * handling() + ping() + squeak() * level_to_linear([[1.5], [-1.5]])
    walls = room()
    far = thuds() + background()
    near = near + scrapes()
    blows = cracks() + knock()
    sharp = np.array([level_to_linear(0.5) * blows, level_to_linear(-1.0) * np.roll(blows, RIGHT_LAG)])
    reflected = signal.fftconvolve(near + level_to_linear(-4.5) * sharp, walls, axes=1)[:, :N]
    return near + sharp + level_to_linear(-6.0) * reflected + far


# pitch_hz, depth_db (under the loudest band)
GATE_FLOOR = [(4500, 38), (7000, 41.5), (9500, 42), (10800, 32.5), (12300, 40), (13500, 46), (14600, 34),
              (15400, 29.5)]


def gate(x, depth_db):
    hz, _, z = signal.stft(x, SR, nperseg=1024)
    bands = (abs(z[:, :512]) ** 2).reshape(2, 32, 16, -1).mean((0, 2))
    level_db = 10 * np.log10(bands + 1e-20)
    faint = level_db < level_db.max(0) - read(GATE_FLOOR, hz[8:512:16, None])
    shut = faint * (hz[:512:16, None] > 4500)
    z[:, :512] *= np.repeat(level_to_linear(-depth_db * shut), 16, 0)
    return signal.istft(z, nperseg=1024)[1][:, :N]


def band_limit(x):
    return signal.sosfilt(signal.butter(12, 15680, fs=SR, output="sos"), x)


def record(dry):
    deaf = signal.firwin(255, [10900, 11900, 15350], fs=SR)
    heard = signal.oaconvolve(band(dry, 66, 22000), deaf[None], "same")
    gated = gate(heard, depth_db=19)
    return band_limit(np.clip(gated, -1, 1))


dry = scene()
out = record(dry)
to_wav(out)
```